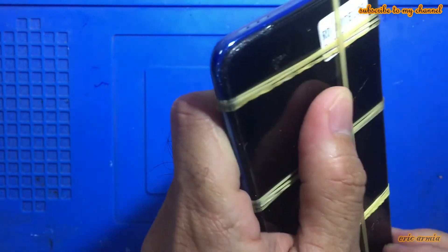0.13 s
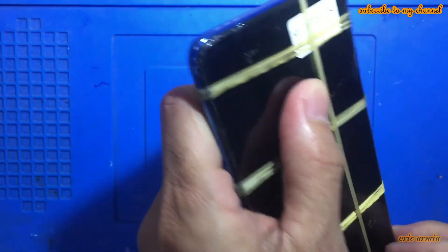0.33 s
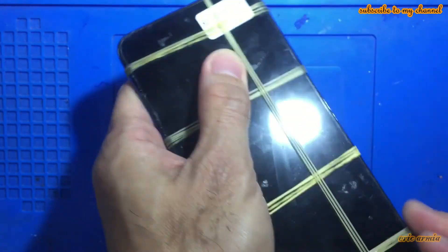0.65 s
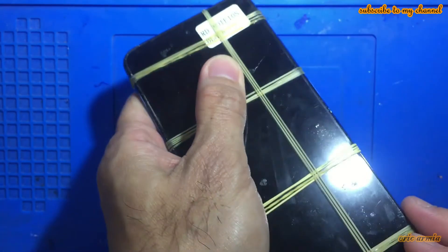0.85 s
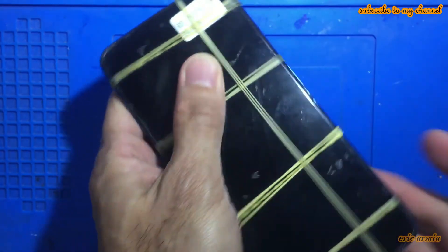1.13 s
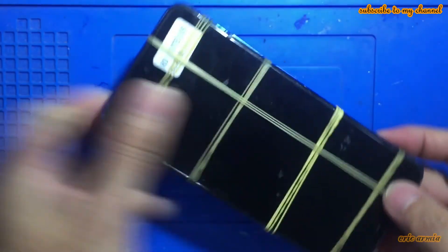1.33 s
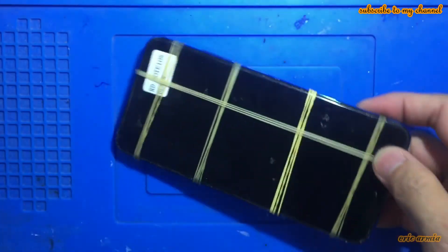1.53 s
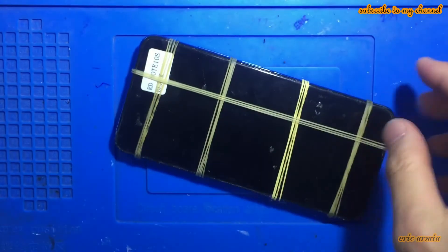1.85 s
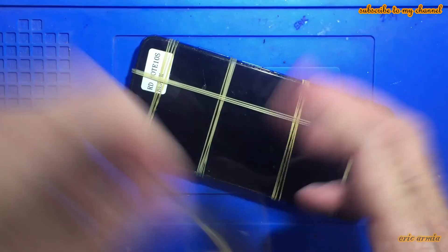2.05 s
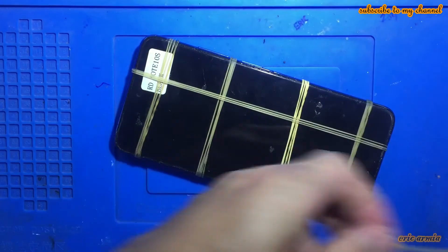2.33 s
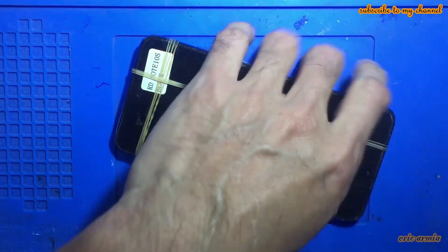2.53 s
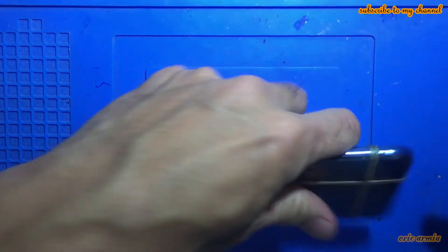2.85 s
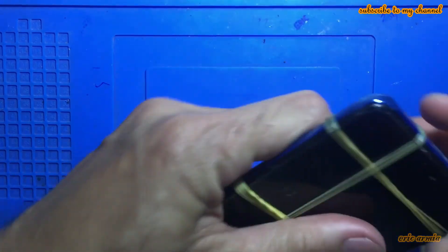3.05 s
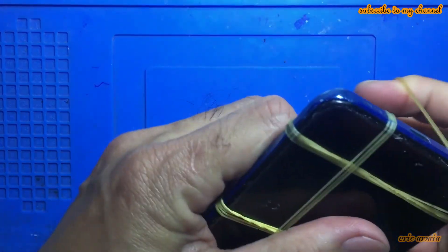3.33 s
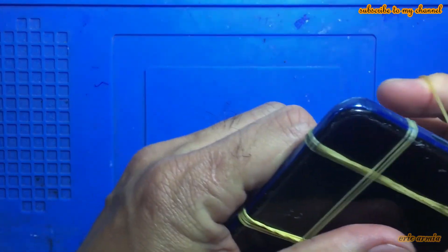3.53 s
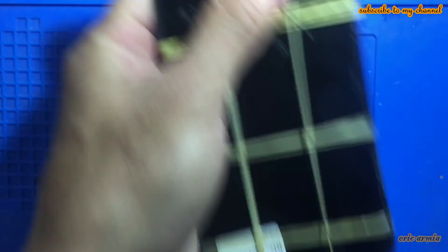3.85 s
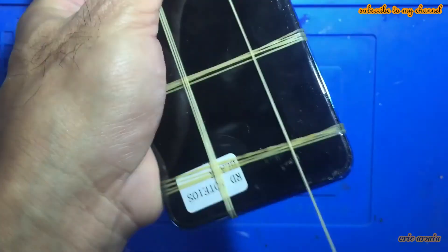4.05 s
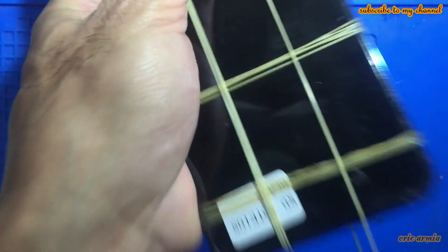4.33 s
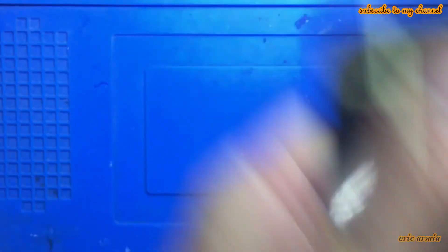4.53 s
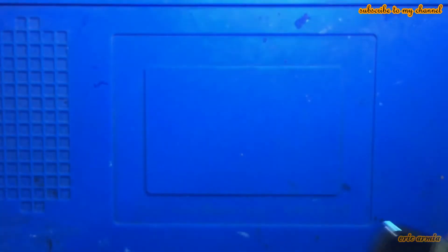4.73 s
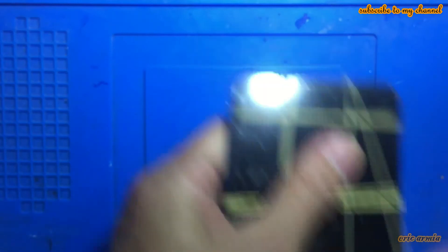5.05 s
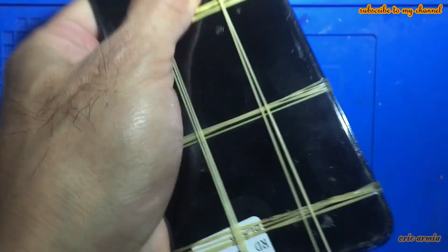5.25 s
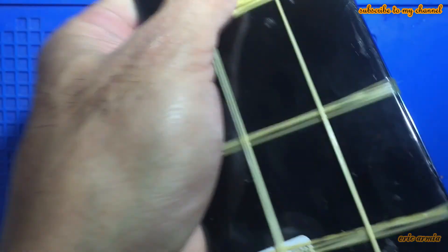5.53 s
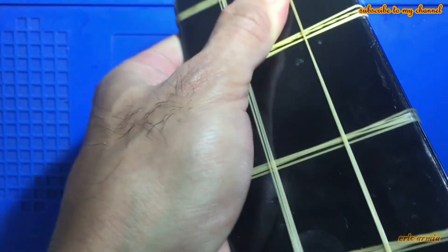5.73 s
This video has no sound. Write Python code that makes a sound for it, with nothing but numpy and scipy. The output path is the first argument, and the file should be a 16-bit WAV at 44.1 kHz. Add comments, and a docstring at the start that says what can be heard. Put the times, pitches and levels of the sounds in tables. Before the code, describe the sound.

Rubber bands click and snap against a phone close to the microphone, over a faint, steady machine hum in the room. Sharp little clusters come at about 0.3 and 0.7 seconds, the second with a tiny twang, and more taps follow around 1.4 seconds. From 1.7 to 2.1 seconds the phone is set on a desk mat, giving muffled low thumps mixed with clicks and a short sliding hiss. Another snap comes at 2.5 seconds, then softer bumps until 3 seconds and a lull. Around 3.8 to 4.2 seconds a band creaks as it stretches, then snaps with brief high twangs. More twanging snaps land near 4.9 and 5 seconds. The loudest crack comes at 5.2 seconds, followed by rubbing and short rubbery creaks. A last quick run of clicks and light knocks arrives around 5.7 seconds.

```python
"""Rubber bands on a phone

Hands stretch rubber bands round a phone above a desk mat, close to a camera's one microphone.
Bands strike the glass and excite the phone's modes, twang as strings when let go, hiss as they slide
and creak by stick-slip friction. Setting the phone down shakes the desk and the camera stand.
A distant machine hums in the room."""
import sys
import numpy as np
from scipy import signal
from scipy.fft import rfft, irfft
from scipy.io import wavfile
from scipy.ndimage import uniform_filter1d

SR = 44100
rng = np.random.default_rng(int(sys.argv[2]) if len(sys.argv) > 2 else 0)


def to_wav(s):
    """Save 16-bit WAV."""
    ch = np.atleast_2d(s).T  # columns
    pcm = np.round(np.clip(ch, -1, 1) * 32767)  # PCM
    wavfile.write(sys.argv[1], SR, pcm.astype(np.int16))


N = 259299

# Spectrum of the room noise. Each row: frequency in Hz, relative level in dB.
AIR_SPECTRUM = [(15, -40), (25, -22.5), (86, -13), (113, -14), (156, -16), (228, -20), (447, -19),
                (586, -4), (746, -27.5), (951, -20), (1150, -27), (1820, -25), (4930, -38), (14100, -46.5),
                (15700, -52)]
# Spectral lines of the machine. Each row: frequency in Hz, width in Hz, rms level in dB.
HUM_LINES = [(229, 19, -75), (565, 108, -73.5), (594.5, 13.6, -80), (651, 8.8, -70), (704, 6.1, -76.5),
             (962.5, 21, -70)]
# A band lands on the glass. Each row: start in seconds, level in dB, relative levels in dB of
# the body (1.7 kHz), the treble and the tick, crack t60 in seconds, centre of the ring in Hz.
SNAPS = [(0.0811, -33.5, -9, -2.5, 6.5, 0.016, 1560), (0.111, -48, 14, -12, 0, .024, 1860),
         (0.1418, -32.5, 7, 10, 5, 0.02, 1950), (0.2724, -44, -9, 5, 5, .042, 1950),
         (0.2819, -22, -4.5, 0, 3.5, 0.033, 1900), (0.2846, -28, -12, -4, 1.5, .02, 3500),
         (0.2884, -26, 2, -25, 5, .025, 1590), (0.2918, -29, 0, -25, 3, .03, 2120),
         (0.3225, -40, -7, 8, 2, .024, 1810), (0.3516, -44, 12, -6, -1, 0.037, 1860),
         (0.3655, -35, 2, -3, -2, .02, 1260), (0.3674, -26.5, 3, -9, 2, .03, 2800),
         (0.636, -41.5, -15, -6, 0, .03, 2100), (0.6529, -17.5, -13, 7.5, 8, 0.032, 3600),
         (0.6719, -23, -5, -12, 5, .035, 3480), (0.6787, -32, 4, 1, -3, 0.075, 1980),
         (0.6865, -23.5, -7.5, -11, -4, .025, 3150), (1.1115, -53.5, -17, -2, 5, 0.01, 6500),
         (1.2242, -33, -28, -1, 15, .01, 6660), (1.3099, -43.5, -5, -28, 0, .04, 2430),
         (1.3542, -28, 6, -10, -13, 0.023, 1590), (1.3649, -29, -4, -10, -4, 0.058, 2620),
         (1.374, -39, -2, -15, -1, 0.025, 3000), (1.3794, -36, -8, -14, -6, .035, 3900),
         (1.4451, -30.5, 1, 1, 6.5, 0.025, 6700), (1.4495, -28, 2, 6, 3.5, 0.03, 6690),
         (1.6774, -22, -12, 10, 4.5, .028, 7700), (1.6854, -35, 8, -9, 9, .026, 6910),
         (1.722, -46, -11, 0, 0, .03, 5280), (1.7408, -25, -10, 10, 8.5, 0.018, 7700),
         (1.7443, -32, 15, -4, 0.5, 0.034, 1730), (1.8283, -42, 4, -9, -2, .039, 1430),
         (1.8602, -38.5, -13, -17, -5, 0.021, 1410), (1.9376, -42, 2, -2, 3, 0.047, 6900),
         (1.952, -24.5, -12.5, -8, -1.5, .025, 2760), (2.0165, -37, 2, -5, -1, 0.063, 2460),
         (2.044, -35, -6, -20, -5, .03, 2500), (2.3431, -47.5, -4, -5, 9, .02, 2350),
         (2.4573, -46.5, -6, -3, -5, 0.033, 1960), (2.4882, -44, -4, -17.5, 4, .021, 2120),
         (2.5007, -24, -12, -18, 14, .015, 2990), (2.5215, -37, 14, -10, 8, .015, 900),
         (2.522, -25, -12, -16, 8, .018, 3000), (2.5355, -47, -5, -13, 4, .03, 2700),
         (2.6892, -48.5, -1, -35, -4, .02, 2400), (2.7156, -38, 9, -19, -10, 0.074, 1180),
         (2.7356, -45, 8, -22, 0, 0.017, 1940), (2.8995, -47, -5, -23, 3, .05, 1500),
         (3.5076, -40.5, -10, -1, 4, .035, 4500), (3.532, -49, -1, -7, 3, .019, 1800),
         (3.8397, -30.5, 0, 4, 11, .03, 2330), (3.8447, -37, -1, -8, 13, 0.016, 1750),
         (4.0799, -22, -2, 0, 0, .04, 2400), (4.1059, -28.5, -3, -13, -3.5, 0.045, 2520),
         (4.1165, -36, 10, -24, -6, 0.045, 1400), (4.1741, -26.5, -23, -2, 0, 0.011, 3400),
         (4.7692, -49.5, -11, -33, 5, .064, 3040), (4.7829, -31.5, 0.5, -7, 5, 0.042, 2900),
         (4.914, -31, 2, 7, 3, 0.05, 5660), (4.9232, -23, -5, -2.5, 15, 0.043, 1870),
         (5.014, -29.5, -20, 10, 5, .031, 2020), (5.1783, -17, 12, -15, 12, .013, 1440),
         (5.2121, -10, -4, -10.5, 1.5, .025, 3700), (5.2247, -29, -4, -14, 2, 0.063, 2960),
         (5.2535, -35, 5, -25, 0, .03, 1800), (5.2588, -30.5, -19, -7, 2, .02, 4400),
         (5.3935, -27.5, 4, -19.5, -13, 0.022, 1410), (5.4138, -39, 0, -39, -2, .027, 1820),
         (5.5031, -28.5, -7, -26, -3, 0.024, 1830), (5.648, -24, -7, -19, -2.5, 0.012, 1740),
         (5.6757, -28, -6, -16, -8, .021, 2420), (5.7009, -24.5, -3, -12, -18, .02, 2050),
         (5.7346, -19, -8, 4, -2.5, .04, 6500), (5.7385, -24, -6, -4, 0, .06, 2950)]
# Modes of the phone. Each row: frequency in Hz, level in dB, t60 in seconds.
PHONE_MODES = [(690, 5, 0.15), (940, -5, 0.15), (1178, -8, 0.12), (1366, -3.5, 0.068), (1596, -8, 0.068),
               (1961, -5, 0.053), (2145, -10.5, 0.079), (2440, -5.5, 0.066), (2783, -8, .04),
               (3002, -3.5, 0.042), (3330, 0, 0.025), (3800, -6.5, 0.033), (4426, 0.5, 0.027),
               (5600, -4, .018), (6500, -5, .015), (7700, -6, .013), (9500, -7, .011), ]
# Reverberation of the room. Each row: frequency in Hz, t60 in seconds.
ROOM_DECAY = [(500, 0.47), (2000, 0.15), (8000, 0.18), (15000, 0.16)]
# A taut strand is let go or rubbed. Each row: start in seconds, level in dB, pitch in Hz,
# t60 in seconds, fall from partial to partial in dB.
TWANGS = [(0.687, -35, 2995, .08, 18), (2.737, -34.5, 2020, .04, 22), (4.04, -41.5, 1336, 0.16, 9),
          (4.084, -43, 1610, .07, 12), (4.2, -48, 1720, 0.069, 20), (4.895, -60, 1915, .12, 5),
          (4.916, -41, 1930, .06, 1.5), (4.923, -35, 1890, .065, 1.8), (4.923, -43, 1340, .08, 4.5),
          (5.012, -45, 1325, .11, .4), (5.012, -37, 1937, .055, 4)]
# Skin and rubber slide. Each row: start, strongest moment and end in seconds, level in dB,
# treble tilt in dB per octave, resonance in Hz.
RUBS = [(1.29, 1.362, 1.46, -60, -8, 2500), (1.68, 1.804, 1.92, -55, -7.5, 1750),
        (1.852, 1.854, 1.95, -58.5, -20.5, 1500), (1.926, 1.965, 2.03, -43, -8, 2500),
        (1.969, 2.03, 2.2, -54, -8, 2620), (2.5, 2.526, 2.6, -59, -5, 2800),
        (2.68, 2.728, 2.8, -59.5, -13, 2100), (2.841, 2.9, 3.0, -63.5, -12.5, 1800),
        (3.493, 3.5, 3.59, -70, -7, 3000), (3.819, 3.84, 3.96, -65, -14, 2200),
        (3.949, 4.05, 4.21, -53, -10, 2200), (4.581, 4.626, 4.72, -64, -7, 2500),
        (4.75, 4.798, 4.88, -60.5, -13, 2800), (5.219, 5.24, 5.38, -44.5, -13, 2900),
        (5.289, 5.335, 5.46, -52.5, -13, 1900)]
# The desk is pushed. Each row: start in seconds, sway level in dB, centre of the sway in Hz,
# knock level relative to the sway in dB, centre of the knock in Hz.
THUMPS = [(1.343, -55, 75, -18, 250), (1.679, -22, 114, -16, 245), (1.745, -24.5, 117, -22, 242),
          (1.795, -36, 47.3, -17, 230), (1.842, -39, 120, 7.5, 350), (1.86, -23.5, 112, -3.5, 340),
          (1.933, -26.5, 108, -22, 250), (1.953, -18.5, 109, -11, 270), (1.982, -24, 97, -18, 247),
          (2.009, -31.5, 98, -23, 250), (2.036, -32, 97, -19, 230), (2.084, -41.5, 106, -29, 230),
          (2.128, -44, 81, -30, 230), (2.691, -34.5, 82, -19, 230), (2.733, -44, 103, -11.5, 230),
          (2.83, -49, 64.6, -16, 230), (2.897, -42.5, 88, -29, 230), (2.96, -49, 54, -21, 230),
          (5.332, -50, 99, -21, 230), (5.648, -46, 91, -0.5, 280), (5.676, -58, 98, -9, 300),
          (5.701, -60, 100, 7, 270), (5.735, -60, 110, 22.5, 224)]
# Modes of the camera stand. Each row: frequency in Hz, level in dB, t60 in seconds.
STAND_MODES = [(46.2, -4.5, 0.59), (61, 8, 0.12), (78.1, 6, 0.16), (112, 7, 0.15), (144, -4.5, 0.16)]
# Modes of the desk board. Each row: frequency in Hz, level in dB, t60 in seconds.
DESK_MODES = [(202, 0, 0.061), (227.4, 4, 0.11), (279, 4.5, 0.077), (330.5, 1, 0.056), (407, -13, 0.11)]
# A band slips. Each row: start and length in seconds, first and last level in dB,
# first and last rate in slips per second, first resonance in Hz, roughness from 0 to 1.
CREAKS = [(3.847, .024, -47, -51, 307, 310, 1850, .02), (3.914, 0.11, -54, -34.5, 45.7, 132, 1690, 0.67),
          (4.034, 0.042, -37, -54, 311, 248, 2110, 0.67), (5.184, .024, -33, -33, 270, 115, 950, 0.27),
          (5.268, .05, -33, -44, 79.8, 87.6, 1390, 0.32), (5.327, .058, -35.5, -30.5, 82, 97.5, 1750, .6)]
# Response of the microphone port. Each row: frequency in Hz, gain in dB.
PORT_RESPONSE = [(4300, -1), (5200, 1), (6200, 3.5), (9400, 2.5), (10500, -1.5), (11800, 1.2), (13500, 2),
                 (15500, -1.5)]


def gain_of(db):
    """Converts decibels to an amplitude ratio."""
    return 10 ** (np.asarray(db) / 20)


def unit_rms(x):
    """Normalises to rms 1."""
    return x / np.sqrt(np.mean(x ** 2) + 1e-20)


def unit_peak(x):
    """Normalises to peak 1."""
    return x / (abs(x).max() + 1e-12)


def flutter(shape, samples):
    """A moving average turns white noise into a slow fluctuation of rms 1."""
    return unit_rms(uniform_filter1d(rng.standard_normal(shape), samples))


def curve_at(points, hz):
    """Interpolates on a log-frequency axis."""
    known_hz, value = np.transpose(points)
    return np.interp(np.log(hz + 1), np.log(known_hz + 1), value)


def add(mix, start, sound):
    """Superposition: adds a sound at its start in seconds."""
    part = mix[round(start * SR):][:len(sound)]
    part += sound[:len(part)]


def coloured(x, points):
    """Filters x by a response of (Hz, dB) points."""
    return irfft(rfft(x) * gain_of(curve_at(points, np.fft.rfftfreq(len(x), 1 / SR))), len(x))


def resonate(x, hz, *widths_hz):
    """Resonance by heterodyning: shift hz to zero, low-pass, shift back; one pass for each width."""
    carrier = np.exp(2j * np.pi * np.cumsum(hz * np.ones(len(x))) / SR)
    for width in widths_hz:
        pole = np.exp(-np.pi * width / SR)
        x = 2 * (carrier * signal.lfilter([1 - pole], [1, -pole], x / carrier)).real
    return x


def ring(modes, centre_hz, db_per_octave, t, scatter):
    """Modal vibration: damped sines, varied at each strike and weaker far from the centre frequency."""
    hz, db, t60 = np.transpose(modes)[:, :, None]
    level_spread, detune = scatter * rng.standard_normal((2, len(modes), 1))
    db = db - db_per_octave * abs(np.log2(hz / centre_hz)) + 3 * level_spread
    sines = np.sin(2 * np.pi * hz * (1 + .03 * detune) * t)
    return unit_peak((gain_of(db - 60 * t / t60) * sines).sum(0))


def air_and_hum(air_db=-60):
    """Amplitude modulation: a machine's noisy lines waver singly and swell together over room noise."""
    sound = gain_of(air_db) * unit_rms(coloured(rng.standard_normal(N + 1), AIR_SPECTRUM)[:N])
    swell_db = 2.7 * unit_rms(resonate(resonate(rng.standard_normal(N), 3.1, 6.6), 4.2, 6.6))
    sound += (gain_of(swell_db - 1.2) - 1) * resonate(sound, 600, 280)  # noise near 600 Hz swells too
    for hz, width, db in HUM_LINES:
        waver_db = 3.9 * unit_rms(resonate(rng.standard_normal(N), 0, 12))
        line = resonate(rng.standard_normal(N), hz, width, 3 * width)
        sound += gain_of(db) * unit_rms(gain_of(swell_db + waver_db) * line)
    return sound


def snap(on_desk, db, body_db, treble_db, tick_db, t60, centre_hz):
    """Impact excitation: a band lands with a tick and a crack of noise that drives the phone's modes."""
    t = np.arange(4096) / SR
    knock_db = -7.5 if on_desk else -24.5 + 1.03 * body_db  # in the hand the lows follow the body
    spectrum = [(350, knock_db - 13), (800, knock_db), (1700, body_db), (3800, .013),
                (9000, treble_db), (12500, treble_db + .5), (16000, treble_db - 7.5)]
    noise = rng.standard_normal(len(t))
    fall_db = 60 * t / max(t60, .005)
    rise = (1 - np.exp(-t / .00041)) ** 2
    # Damped by the grip to a quarter of their t60, the modes colour the crack and the tick.
    gripped = ring(PHONE_MODES * np.array([1, 1, .25]), centre_hz, 10, t, scatter=.3)
    gripped = gain_of(1.5) * gripped / np.linalg.norm(gripped)
    hiss = coloured(noise + signal.fftconvolve(noise, gripped)[:len(t)], spectrum)
    dull = signal.lfilter(*signal.butter(2, 5000, fs=SR), hiss)
    bright = hiss - dull
    crack = unit_peak(rise * (dull * gain_of(-fall_db) + bright * gain_of(-1.4 * fall_db)))
    contact = np.sinc(SR * (t - .0013))
    tick = unit_peak(rise * coloured(contact + signal.fftconvolve(contact, gripped)[:len(t)], spectrum))
    free_modes = ring(PHONE_MODES, centre_hz, 19, t, scatter=.44)
    ringing = signal.fftconvolve(noise * rise * gain_of(-2 * fall_db), free_modes)[:len(t)]
    ring_db = -13.5 - .22 * (db + 33)  # soft snaps ring relatively more
    impact = unit_peak(crack + gain_of(tick_db) * tick)
    return gain_of(db) * (impact + gain_of(ring_db) * unit_peak(ringing))


def reverberation(x):
    """Sparse reflections of random sign decay exponentially, each frequency band at its own rate."""
    reflections = np.zeros(SR // 2)
    slots = np.arange(130, len(reflections) - 20, 20)
    reflections[slots + rng.integers(0, 20, len(slots))] = rng.choice([-1., 1.], len(slots))
    hz, t, spectra = signal.stft(reflections, SR, nperseg=256)
    decay = gain_of(-60 * t / curve_at(ROOM_DECAY, hz)[:, None])
    tail = signal.istft(spectra * decay, SR, nperseg=256)[1]
    return signal.fftconvolve(x, tail / np.linalg.norm(tail))[:N]


def twang(db, hz, t60, fall_db):
    """String vibration: a strand's nearly harmonic partials buzz on the glass; high ones die first."""
    t = np.arange(8000) / SR
    harmonic = np.arange(1, 9)[:, None]
    rise_s = .0003 + .00015 * abs(fall_db)  # mellow twangs start softly
    detune, phase, level_spread = rng.standard_normal((3, len(harmonic), 1))
    partials = np.sin(2 * np.pi * (hz * harmonic * (1 + .004 * detune) * t + phase))
    buzz_db = .85 * (harmonic + 1) * flutter((len(harmonic), len(t)), 90)
    decay_db = 60 * t * harmonic ** .7 / t60
    levels = gain_of(db + buzz_db + 1.9 * level_spread - fall_db * (harmonic - 1) - decay_db)
    return (levels * partials).sum(0) * (1 - np.exp(-t / rise_s))


def rub(start, strongest, end, db, tilt_db, ring_hz, ring_width_hz=700, crackles_per_s=90):
    """Sliding friction: jerky, grainy noise with stray crackles, coloured by the rubbed part's resonance."""
    t = np.arange(start, end, 1 / SR)
    grain = gain_of(3.8 * flutter(len(t), 130))
    jerks = gain_of(2 * flutter(len(t), 700))
    crackles = (rng.random(len(t)) < crackles_per_s / SR) * gain_of(8.5)
    friction = grain * jerks + signal.lfilter([1], [1, -np.exp(-1 / (.0006 * SR))], crackles)
    hz, _, spectra = signal.stft(unit_rms(friction * rng.standard_normal(len(t))), SR, nperseg=256)
    tilt = gain_of(tilt_db * np.log2(np.clip(hz, 1800, 7500) / 3500))
    low_cut = hz ** 2 / (hz ** 2 + 1100 ** 2)
    resonance = 1 + gain_of(.5) / (1 + (2 * (hz - ring_hz) / ring_width_hz) ** 2)
    sizzle = gain_of(5 / (1 + (12500 / (hz + 1)) ** 8))  # dry skin sizzles at the very top
    response = tilt * low_cut * resonance * sizzle
    hiss = signal.istft(spectra * response[:, None], SR, nperseg=256)[1][:len(t)]
    level_db = db + np.interp(t, [start, strongest, end], [-7.5, 0, -19])
    return gain_of(level_db) * hiss * signal.windows.tukey(len(t), .15)


def thump(db, sway_hz, knock_db, knock_hz, push_cycles=.61):
    """Structure-borne sound: a push sets the camera stand swaying; the desk board knocks at once."""
    t = np.arange(SR // 2) / SR
    push = 1 - np.exp(-t * sway_hz / push_cycles)
    strike = (1 - np.exp(-t / .003)) ** 2
    sway = unit_peak(push * ring(STAND_MODES, sway_hz, 15, t, scatter=.055))
    knock = unit_peak(strike * ring(DESK_MODES, knock_hz, 12, t, scatter=.3))
    return -gain_of(db) * (sway + gain_of(knock_db) * knock)


def creak(length, first_db, last_db, first_rate, last_rate, first_hz, rough):
    """Stick-slip friction: each slip, part clean pulse and part noise, excites two moving resonances."""
    t = np.arange(0, length + .02, 1 / SR)
    progress = np.minimum(t / length, 1)
    rate = first_rate * (last_rate / first_rate) ** progress
    hz = first_hz * (rate / first_rate) ** .16  # faster slips raise the resonances
    uneven = np.exp(.07 * np.sqrt(rough) * flutter(len(t), 200))
    slip_count = np.floor(np.cumsum(rate * uneven) / SR)
    level_db = first_db + (last_db - first_db) * progress + 1.7 * rng.standard_normal(len(t))
    slips = np.diff(slip_count, prepend=-1) * (t <= length) * gain_of(level_db)
    puff_age = np.arange(500) / (.0011 * SR)  # a puff peaks after 1.1 ms
    puff_envelope = signal.fftconvolve(slips, puff_age * np.exp(1 - puff_age))[:len(t)]
    puffs = puff_envelope * rng.standard_normal(len(t))
    drive = rough * puffs + (1 - rough) * 8 * slips
    lower = resonate(drive, hz, 850, 850)
    upper = gain_of(2 - 14 * rough) * resonate(resonate(drive, 1.48 * hz, 750), 1.45 * hz, 800)
    bright_edge = gain_of(-10) * rough * resonate(puffs, 6000, 1500, 1500)
    hiss = .015 * np.diff(puffs, prepend=0)
    return 3.6 * (lower + upper) + bright_edge + hiss


def scene(room_db=-13.5):
    """Two transmission paths: airborne sound reverberates; desk vibration arrives directly."""
    airborne, desk = np.zeros(N), np.zeros(N)
    push_times = np.transpose(THUMPS)[0]
    for start, *row in SNAPS:
        on_desk = abs(push_times - start).min() < .025
        add(airborne, start, snap(on_desk, *row))
    for start, *row in TWANGS:
        add(airborne, start, twang(*row))
    for start, *row in CREAKS:
        add(airborne, start, creak(*row))
    for start, *row in RUBS:
        add(airborne, start, rub(start, *row))
    for start, *row in THUMPS:
        add(desk, start, thump(*row))
    return np.tile(airborne + gain_of(room_db) * reverberation(airborne) + desk + air_and_hum(), (2, 1))


def record(dry, low_cut_hz=36, band_limit_hz=16500):
    """Filters in cascade: the microphone's bass cut, the peaks and notches of its port, a band limit."""
    thinned = signal.sosfilt(signal.butter(8, low_cut_hz, "high", fs=SR, output="sos"), dry)
    hz = np.linspace(0, SR / 2, 257)
    port = signal.firwin2(129, hz, gain_of(curve_at(PORT_RESPONSE, hz)), fs=SR)
    ported = signal.oaconvolve(thinned, port[None], "same")
    low_pass = signal.firwin(255, band_limit_hz, window=("kaiser", 9), fs=SR)
    return signal.oaconvolve(ported, low_pass[None], "same")


dry = scene()
out = record(dry)
to_wav(out)
```